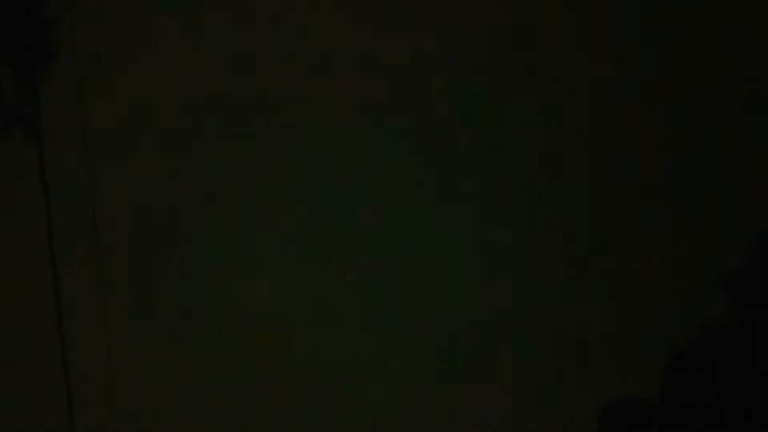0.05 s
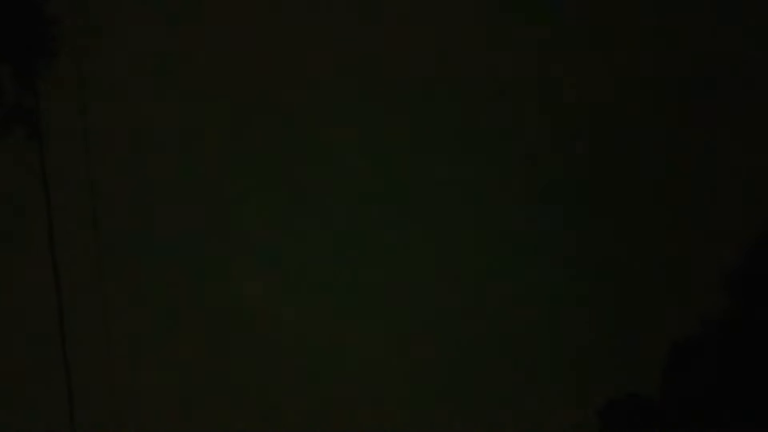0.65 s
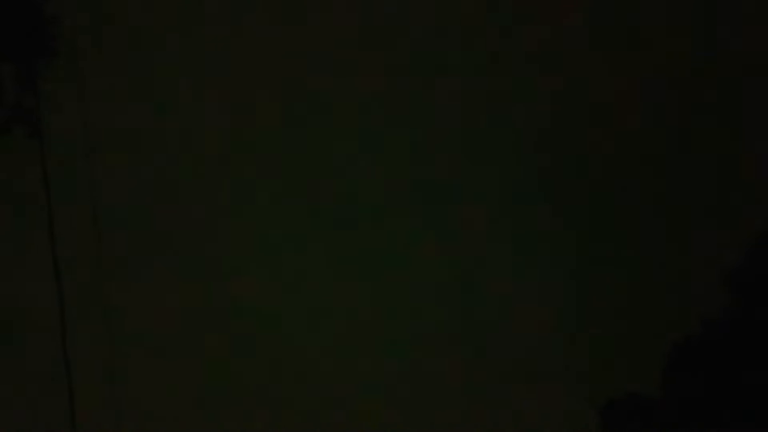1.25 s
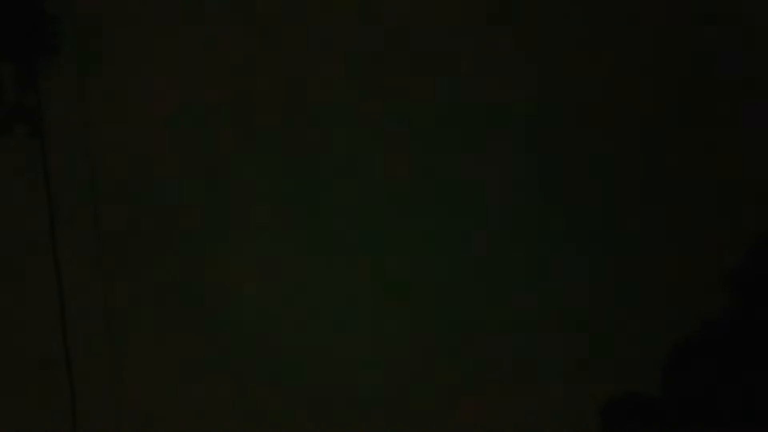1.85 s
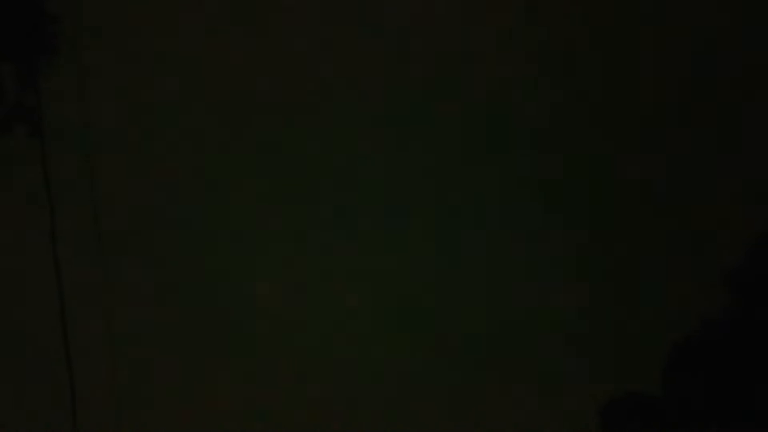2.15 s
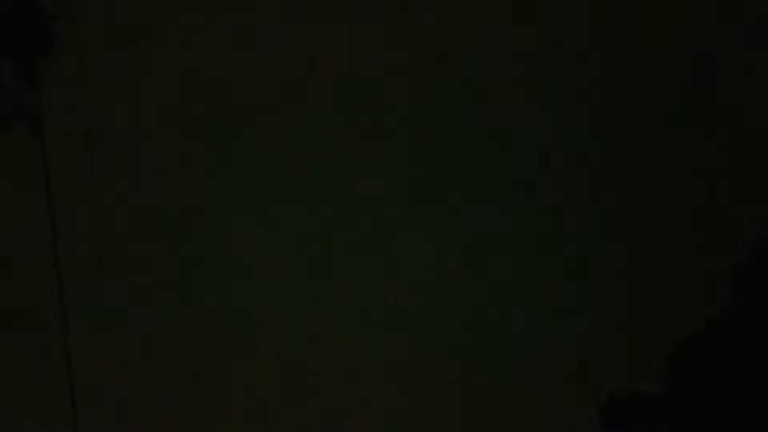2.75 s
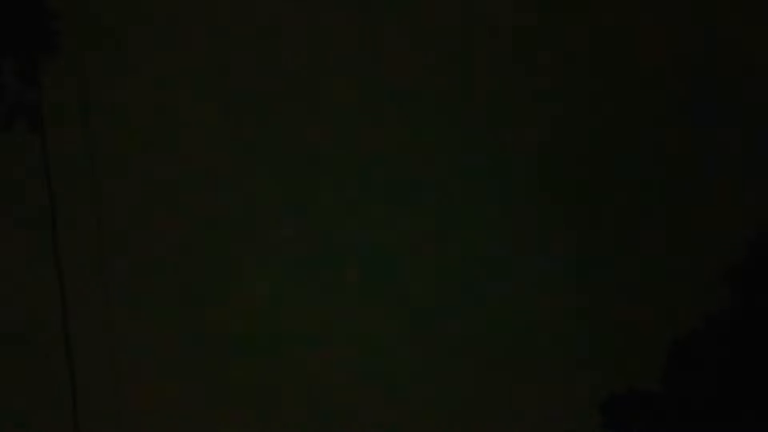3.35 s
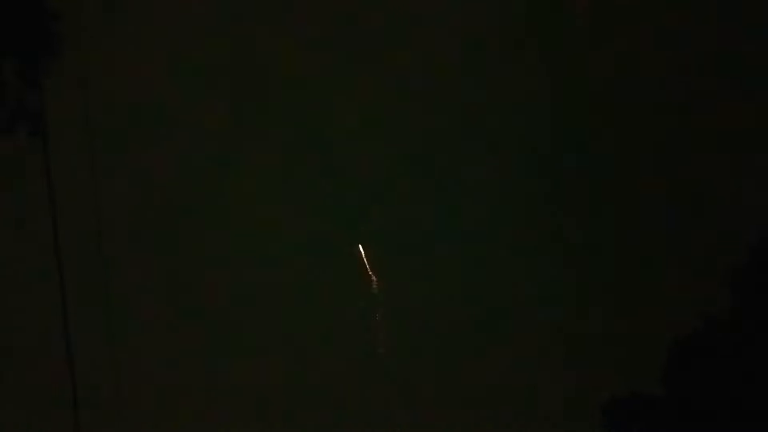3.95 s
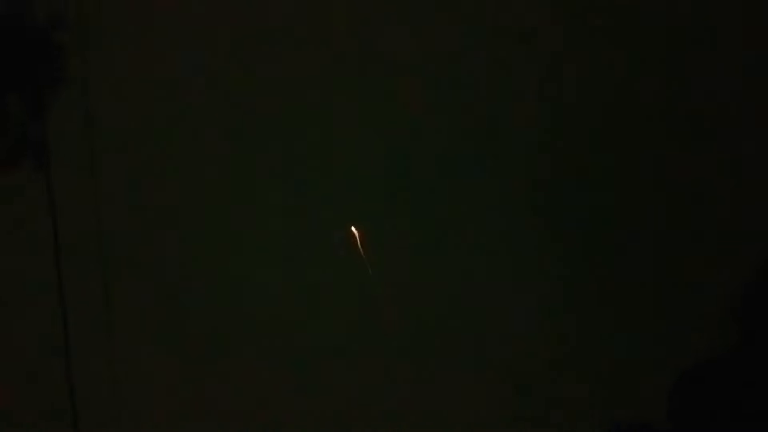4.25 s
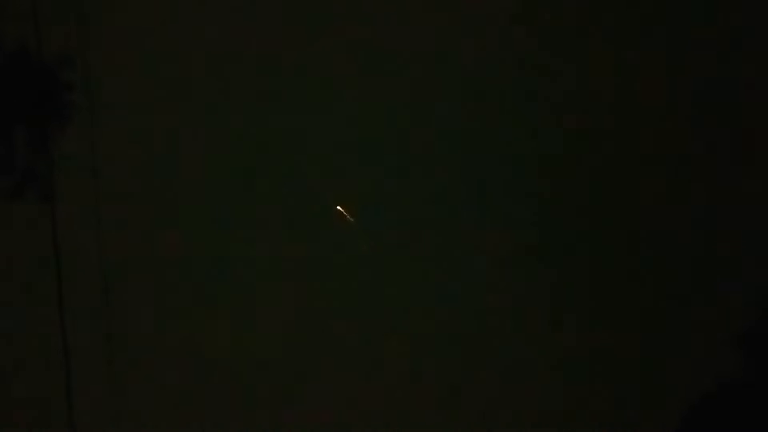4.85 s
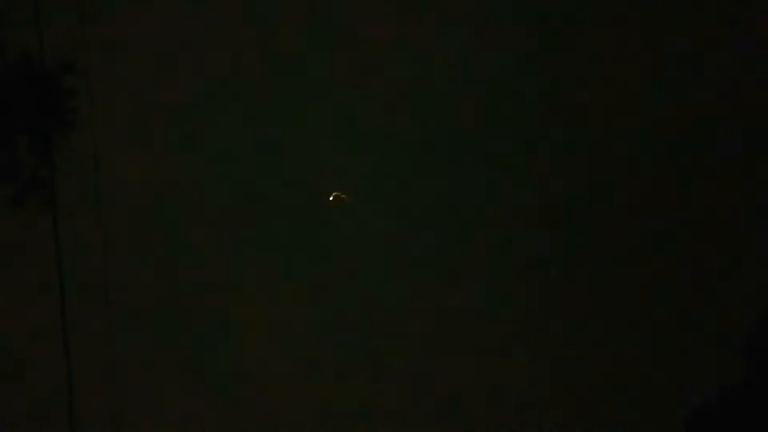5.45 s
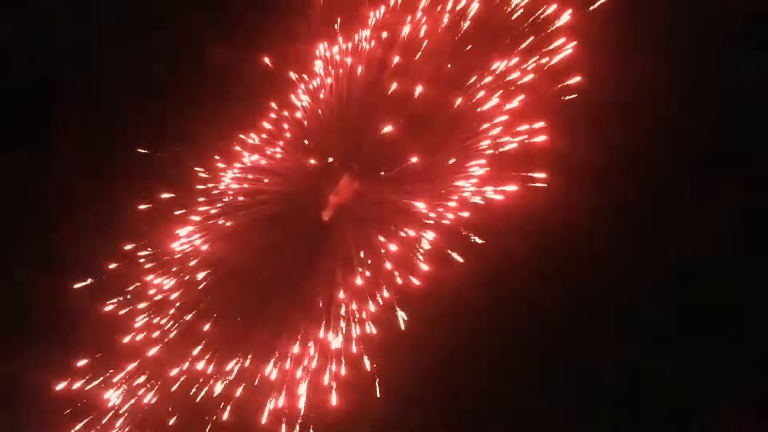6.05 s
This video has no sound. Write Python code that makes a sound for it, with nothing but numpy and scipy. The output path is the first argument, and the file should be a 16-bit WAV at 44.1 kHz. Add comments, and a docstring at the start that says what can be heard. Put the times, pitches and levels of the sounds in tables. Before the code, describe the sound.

For the first three seconds the night outdoors is quiet: insects make a high, rasping hiss that swells and sinks over a low, distant rumble, with a few faint dry ticks. The nearest insect chirps in quick groups of five at about 0.7, 1.6 and 2.6 seconds, and again at 4.1. At about 3 seconds a firework fires from a tube with a sharp, loud bang, a thump and a brief rush of gas, overloading the microphone. Echoes roll back from trees and houses, with several low booms until about 4 seconds, growing duller as they fade and leaving the soft insects behind. At about 5.75 seconds the shell bursts overhead with a louder, harder bang that overloads the microphone again. Its dense, booming echoes are still rolling when the sound ends just after 6 seconds.

```python
"""Outdoors at night, among trees and houses, a firework is fired from a tube and bursts 2.7 s later.
Each bang is a sudden push of air with a rush of hot gas, loud enough to overload the microphone.
The trees and houses scatter it into a roll of echoes that grows duller as it fades.
Behind it, insects rub their wings to make a hiss, and the nearest one chirps in groups of five.
A few faint ticks and a low, distant rumble fill the background."""
import sys
import numpy as np
from scipy import signal
from scipy.fft import rfft, irfft
from scipy.io import wavfile

SR = 44100
rng = np.random.default_rng(int(sys.argv[2]) if len(sys.argv) > 2 else 0)


def log_audio(samples):
    """Write samples as a 16-bit WAV file to the path given in sys.argv[1]."""
    # one column per channel
    frames = np.atleast_2d(samples).T
    # limit to full scale, then quantise
    limited = np.clip(frames, -1, 1)
    pcm = np.round(limited * 32767).astype(np.int16)
    wavfile.write(sys.argv[1], SR, pcm)


N = 269431
TIME = np.arange(N) / SR
HZ = np.fft.rfftfreq(N, 1 / SR)
LAUNCH_S, BURST_S = 3.0455, 5.7481


# air waves of the launch, the burst and their strongest echoes: t/s, level/dB, push/ms, rise/ms
BLAST_WAVES = [(3.055, 10.5, 2.8, 0.63), (3.122, 3, 1.4, .9), (5.7494, 23, 1.3, .036),
               (5.7541, 13, 3.2, .044), (5.759, 9.5, 1.7, 0.12)]
# thumps of the air in the tube, at the launch and in its echo: t/s, level/dB
TUBE_THUMPS = [(3.0554, -9), (3.1227, -3.5)]

def blasts(scatter_count=11, scatter_gap_s=0.0036, scatter_delay_s=0.0145, thump_hz=200):
    """The two bangs: waves of air pressure, their first echoes and the thump of the tube."""
    out = np.zeros(N)
    for s, db, push_ms, rise_ms in BLAST_WAVES:
        add(out, s, blast_wave(db, push_ms, rise_ms))
    # the ground and nearby walls scatter the burst into a quick train of weaker waves
    slots = np.arange(scatter_count) + rng.uniform(-0.57, 0.45, scatter_count)
    for late in slots * scatter_gap_s:
        db = 11.5 - 260 * late  # falls 260 dB a second
        add(out, BURST_S + scatter_delay_s + late, blast_wave(db, push_ms=0.92, rise_ms=0.49))
    for s, db in TUBE_THUMPS:
        tone = np.sin(2 * np.pi * thump_hz * (TIME - s))
        out += gain_of(db) * swell(s, rise=0.0015, t60=0.029) * tone
    # the microphone turns the waves upside down and loses the bass below 56 Hz
    return signal.lfilter(*signal.butter(2, 56, "high", fs=SR), -out)


def blast_wave(db, push_ms, rise_ms):
    """The air gives one steep push, then a longer, gentler pull."""
    ms = np.arange(SR // 10) / SR * 1000
    front = 1 - np.exp(-(ms / rise_ms) ** 2)
    return gain_of(db) * front * (1 - ms / push_ms) * np.exp(-ms / push_ms)


# rushes of hot gas and shreds of casing: t/s, body level/dB, crack level/dB, rise/s, fade/s
GAS_RUSHES = [(3.0414, -9.5, -11, 0.012, 0.094), (3.066, -22.5, -15, 0.0015, 0.32),
              (5.7480, 1, -4, 0.000098, 0.037), (5.7537, -2, -5, 0.0021, 0.039),
              (5.771, -15, -17, 0.0093, 0.21)]
# tone of a rush's deep body and of its bright crack: f/Hz, level/dB
BODY_TONE = [(60, -58), (180, 12), (300, 5.5), (400, -2.5), (550, 2), (750, -27), (1100, -6), (2500, -72)]
CRACK_TONE = [(300, -52), (700, -1), (1100, -0.5), (1650, 3.5), (2300, 5), (3100, -0.5), (4000, -4.5),
              (5500, -7.5), (9500, -7), (11000, -12.5), (15500, -15)]

def gas_rushes():
    """Swirling gas roars for a moment around each bang."""
    body, crack, out = noise(BODY_TONE), noise(CRACK_TONE), np.zeros(N)
    for s, body_db, crack_db, rise, t60 in GAS_RUSHES:
        out += swell(s, rise, t60) * (gain_of(body_db) * body + gain_of(crack_db) * crack)
    return out


# hollow notes of the tube, the last an echo from afar: t/s, f/Hz, width/Hz, level/dB, rise/s, fade/s
TUBE_NOTES = [(3.046, 3850, 700, -13.5, .003, 0.03), (3.068, 1580, 280, -8.5, 0.0022, 0.04),
              (3.080, 2070, 380, -21.5, .006, 0.28), (3.150, 2180, 520, -18.5, 0.021, 0.16)]

def launch_tube():
    """The escaping gas makes the tube ring with short, rough notes."""
    return sum(gain_of(db) * swell(s, rise, t60) * band_noise(hz, width)
               for s, hz, width, db, rise, t60 in TUBE_NOTES)


# tone of each roll of echoes, fresh_s after its bang: f/Hz, level/dB
LAUNCH_TONE = [(25, -47), (60, -7.5), (150, -3.5), (310, -7), (410, -11), (650, -7.5), (740, -9), (860, -6),
               (1080, -8.5), (2350, -4), (3200, -8), (6000, -13), (9200, -18.5), (15500, -37)]
BURST_TONE = [(25, -53), (70, -16), (130, -8), (220, -3), (350, -2.5), (550, -4), (800, -7), (1100, -8),
              (1450, -7), (1700, -8.5), (2300, -6), (3200, -10.5), (9000, -18), (15500, -37)]
# pitches that ring in both rolls: f/Hz, width/Hz, boost/dB
ROLL_PEAKS = [(320, 46, 5.5), (385, 65, -1), (1515, 91, 5.5), (2040, 180, 3), (2190, 160, 1.5),
              (9170, 330, 4.5)]
# sound lost to ground, air and leaves, compared with the middle pitches: f/Hz, loss/(dB per s)
PATH_LOSS = [(70, 5), (290, -1), (450, -2), (1000, 2.5), (1500, 7.5), (2200, 5.5), (4000, 13.5),
             (7000, 24.5), (10000, 42), (15000, 58)]
# booms thrown back by single large walls: t/s, level/dB compared with the roll
WALL_BOOMS = [(3.167, 8.5), (3.28, 0), (3.426, 5), (3.565, 3), (3.70, 6.5), (3.95, 6.5), (5.782, -6),
              (5.858, 4.5), (5.928, 4), (6.025, 4), (6.072, -1)]

def roll(start, tone, boom_db, clatter_db, build_s, fresh_s, sag_db_per_s, hold_s=0.44):
    """Countless small echoes blend; the later ones have come further and lost their high pitches."""
    hz, t, spectrum = signal.stft(rng.standard_normal(N), SR, nperseg=1024)
    # echoes on nearly equal paths boost or cancel each other, mostly at high pitches
    ripple_db = 2.5 * rng.standard_normal(len(hz)) * np.minimum(hz / 3000, 1)
    shape = gain_of(read(tone, hz) + peaks(ROLL_PEAKS, hz) + ripple_db)[:, None]
    hz = hz[:, None]
    travel_s = np.maximum(t - start, 0) - fresh_s
    spectrum = spectrum * shape * gain_of(-read(PATH_LOSS, hz) * travel_s)
    # walls return the low boom in lumps, leaves return a more even clatter
    low = 1 / (1 + (hz / 500) ** 6)
    middle = (hz > 600) & (hz < 1700)
    boom = signal.istft(spectrum * low, SR)[1][:N] / rms(shape * low)
    clatter = signal.istft(spectrum * (1 - low), SR)[1][:N] / rms(shape * middle)
    wall_power = sum((gain_of(db) * swell(s, rise=0.0072, t60=0.22)) ** 2 for s, db in WALL_BOOMS)
    sound = gain_of(boom_db) * np.sqrt(1 + wall_power) * boom + gain_of(clatter_db) * clatter
    # the roll holds nearly level for a moment, then fades an extra 9.5 dB each time its age doubles
    age = np.maximum(TIME - start, 0)
    doublings = np.log2(np.maximum(age / hold_s, 1))
    fade = gain_of(-sag_db_per_s * age - 9.5 * doublings)
    return sound * np.minimum(age / build_s, 1) * fade * flutter(rate_hz=74, depth_db=0.28)


# tone of the far insects, the near ones, their high sizzle and the chirps: f/Hz, level/dB
FAR_TONE = [(1000, -31), (1550, -14.5), (1950, -3.5), (2450, -2.5), (2950, -1.5), (3400, -9.5), (5000, -32),
            (7000, -42)]
RASP_TONE = [(1500, -26), (2000, -24), (3000, -3), (3600, -8), (4400, 0.5), (5200, -1), (5600, -5.5),
             (5800, -4.5), (6400, -8.5), (7100, -20.5), (10000, -26), (16000, -58)]
SIZZLE_TONE = [(5000, -33), (7500, -26), (9500, -2.5), (11000, -4), (12500, 2.5), (14500, 0), (16000, 1)]
CHIRP_TONE = [(1500, -30), (2900, -5), (3600, -4), (4400, 1), (5750, 0.5), (6500, -17), (7500, -26),
              (16000, -45)]
# pitches at which single insects' wings ring: f/Hz, width/Hz, boost/dB
WING_PEAKS = [(1916, 180, 4), (3100, 160, 0.2), (4320, 97, -1), (4700, 120, 0.5), (5590, 110, 5.5),
              (12100, 970, 2)]

def insects(far_db=-50, rasp_boost_db=1.2, sizzle_boost_db=3, chirp_sizzle_db=-11):
    """Many rubbing wings blend into a hiss, and the nearest insect chirps above it."""
    rasp_gain, sizzle_gain = rasping()
    chirp_gain = chirping()
    far_gain = gain_of(far_db) * evened(rasp_gain) ** 0.58  # the far insects swell less
    far = far_gain * noise(FAR_TONE, WING_PEAKS) * flutter(rate_hz=16, depth_db=1.17)
    rasp = rasp_gain * noise(RASP_TONE, WING_PEAKS) * flutter(rate_hz=17, depth_db=1.05)
    sizzle_gain = np.hypot(sizzle_gain, gain_of(chirp_sizzle_db) * chirp_gain)  # chirps sizzle too
    sizzle = sizzle_gain * noise(SIZZLE_TONE, WING_PEAKS) * flutter(rate_hz=79, depth_db=0.6)
    chirps = chirp_gain * noise(CHIRP_TONE, WING_PEAKS)
    return far + gain_of(rasp_boost_db) * rasp + gain_of(sizzle_boost_db) * sizzle + chirps


# spells of nearby rasping, before the boosts: t/s, length/s, rasp level/dB, sizzle level/dB
RASP_SPELLS = [(-.04, 0.24, -51, -59.5), (0.527, 0.5, -49.5, -60.5), (1.534, 0.27, -50, -59),
               (2.096, 0.23, -54.5, -65), (2.58, 0.38, -52, -59.5), (4.03, 0.29, -48, -58.5),
               (4.53, 0.35, -51.5, -61), (5.05, 0.25, -49.5, -60.5), (5.717, 0.24, -45.5, -52)]

def rasping(rise_s=0.22, fade_s=1.4, lull_rasp_db=-56, lull_sizzle_db=-70):
    """Loudness of the rasp and its sizzle: each spell rises, holds and sinks back to a lull."""
    rasp_power, sizzle_power = gain_of(lull_rasp_db) ** 2, gain_of(lull_sizzle_db) ** 2
    for s, length, rasp_db, sizzle_db in RASP_SPELLS:
        rise = np.clip((TIME - s) / rise_s + 0.5, 0, 1)
        effort = rise * decay(TIME - s - length, fade_s)
        rasp_power += (gain_of(rasp_db) * effort) ** 2
        sizzle_power += (gain_of(sizzle_db) * effort) ** 2
    return np.sqrt(rasp_power), np.sqrt(sizzle_power)


# the nearest insect's groups of chirps: t/s, rate/(chirps per s), level/dB
CHIRP_GROUPS = [(.688, 11.7, -49), (1.562, 11.0, -49), (2.590, 11.4, -48), (4.129, 11.3, -47.5)]

def chirping(count=5):
    """Loudness of the nearest insect: each group is a run of smooth wing strokes."""
    out = np.zeros(N)
    for s, per_s, db in CHIRP_GROUPS:
        strokes = np.clip((TIME - s) * per_s + 0.5, 0, count)
        out += gain_of(db) * np.sin(np.pi * strokes) ** 2
    return out


# the clearest dry ticks: t/s, level/dB, fade/s
CLEAR_TICKS = [(0.9123, -44.5, .08), (1.0027, -52, .1), (1.4147, -53, .035), (1.6363, -48.5, .057),
               (1.8266, -42.5, 0.038), (2.0767, -47.5, 0.024), (2.2893, -43, .05), (2.373, -42, 0.012),
               (2.562, -50, .08), (2.9254, -51, .06), (3.636, -44, .04), (3.9473, -55, .05)]

def ticks(centre_hz=8500, spread=0.4, faint_per_s=4, faint_db=-56.5, faint_fade_s=0.041):
    """Each tick is a short, ragged spray of high noise; fainter ones come at random."""
    loudness, t = np.zeros(N), np.arange(SR // 6) / SR
    faint = [(s, faint_db, faint_fade_s) for s in TIME[rng.random(N) < faint_per_s / SR]]
    spray = shaped_noise(np.exp(-(np.log((HZ + 1) / centre_hz) / spread) ** 2 / 2))
    for s, db, t60 in CLEAR_TICKS + faint:
        add(loudness, s, gain_of(db) * decay(t, t60))
    return loudness * spray * flutter(rate_hz=350, depth_db=2)


# tone of the still night air: f/Hz, level/dB
RUMBLE_TONE = [(20, -62), (45, -2.5), (75, 1), (140, 0), (250, -6), (450, -10.5), (650, -15), (1100, -16.5),
               (4000, -12.5), (9000, -32), (16000, -40)]
# loudness of its rumble, before the boost: t/s, level/dB
RUMBLE_LEVEL = [(0, -51.5), (1.39, -51.5), (1.47, -56), (1.7, -54), (2.9, -54), (5.7, -50.5)]

def night_air(boost_db=1.0):
    """A low, distant rumble lies under everything."""
    db = np.interp(TIME, *np.transpose(RUMBLE_LEVEL)) + boost_db
    return gain_of(db) * noise(RUMBLE_TONE) * flutter(rate_hz=9.9, depth_db=1.0)


def gain_of(db):
    """Turns decibels into a number to multiply a sound by."""
    return 10 ** (np.asarray(db) / 20)


def rms(x):
    """The average strength of a signal (root mean square)."""
    return np.sqrt(np.mean(x ** 2) + 1e-20)


def evened(x):
    """Scales a signal to strength 1."""
    return x / rms(x)


def read(points, hz):
    """Reads between the rows of a table of f/Hz, value, with all octaves equally wide."""
    f, value = np.transpose(points)
    return np.interp(np.log(hz + 1), np.log(f + 1), value)


def peaks(rings, hz):
    """The decibels that ringing adds at each pitch."""
    return sum(db / (1 + (2 * (hz - f) / width) ** 2) for f, width, db in rings)


def shaped_noise(weights):
    """Noise of strength 1, with a weight for each pitch."""
    return evened(irfft(rfft(rng.standard_normal(N)) * weights, N))


def noise(tone, rings=()):
    """Steady noise with the given tone and ringing pitches."""
    return shaped_noise(gain_of(read(tone, HZ) + peaks(rings, HZ)))


def band_noise(hz, width):
    """Noise gathered around one pitch."""
    return shaped_noise(np.exp(-2 * ((HZ - hz) / width) ** 2))


def flutter(rate_hz, depth_db):
    """A loudness that wanders at random."""
    return gain_of(depth_db * shaped_noise(HZ < rate_hz))


def decay(age, t60):
    """Holds until age 0, then drops 60 dB every t60 seconds: the fade time in the tables."""
    return np.exp(-np.log(1000) * np.maximum(age, 0) / t60)


def swell(s, rise, t60):
    """Rises from time s, then dies away."""
    age = np.maximum(TIME - s, 0)
    return np.minimum(age / rise, 1) ** 2 * decay(age - rise, t60)


def add(mix, s, sound):
    """Mixes a sound in at time s."""
    part = mix[round(s * SR):][:len(sound)]
    part += sound[:len(part)]


def scene():
    """The launch and the burst with their echoes, over the sounds of the night."""
    launch_roll = roll(LAUNCH_S, LAUNCH_TONE, boom_db=-29, clatter_db=-27,
                       build_s=0.02, fresh_s=0.23, sag_db_per_s=7.5)
    burst_roll = roll(BURST_S, BURST_TONE, boom_db=-25.5, clatter_db=-24.5,
                      build_s=0.0068, fresh_s=0.11, sag_db_per_s=-2.0)
    night = insects() + ticks() + night_air()
    return (blasts() + gas_rushes() + launch_tube() + launch_roll + burst_roll + night)[None]


def record(dry):
    """The overloaded microphone flattens the tallest waves; then the very highest pitches are cut."""
    ceiling, top_hz = 0.72, 15880
    clipped = dry / (1 + (dry / ceiling) ** 8) ** (1 / 8)
    low_pass = signal.firwin(511, top_hz, window=("kaiser", 9), fs=SR)
    return signal.oaconvolve(clipped, low_pass[None], "same")


dry = scene()
out = record(dry)
log_audio(out)
```